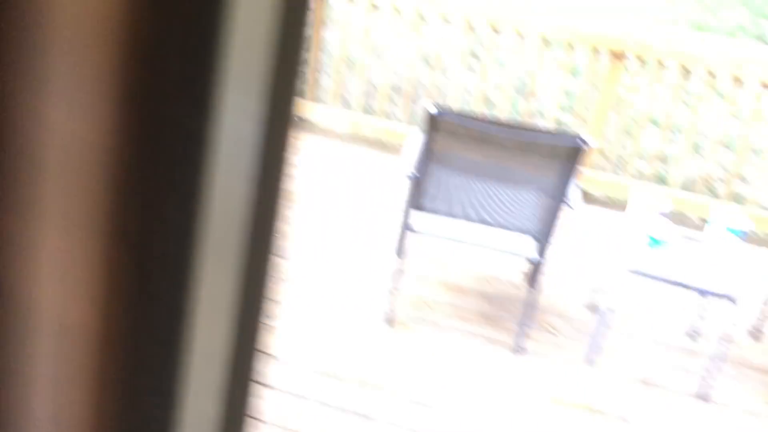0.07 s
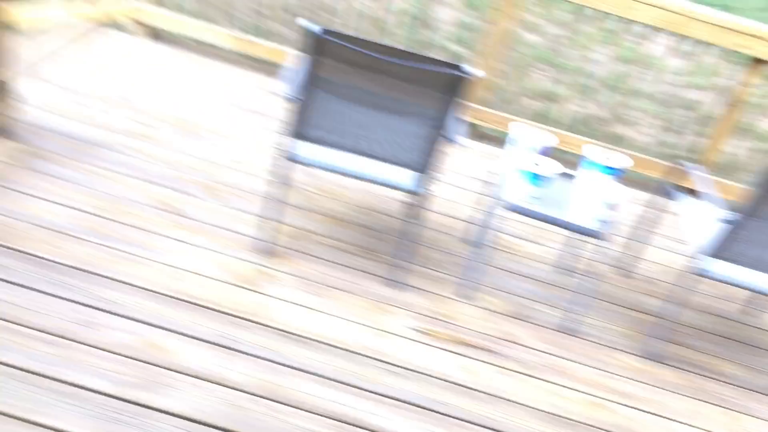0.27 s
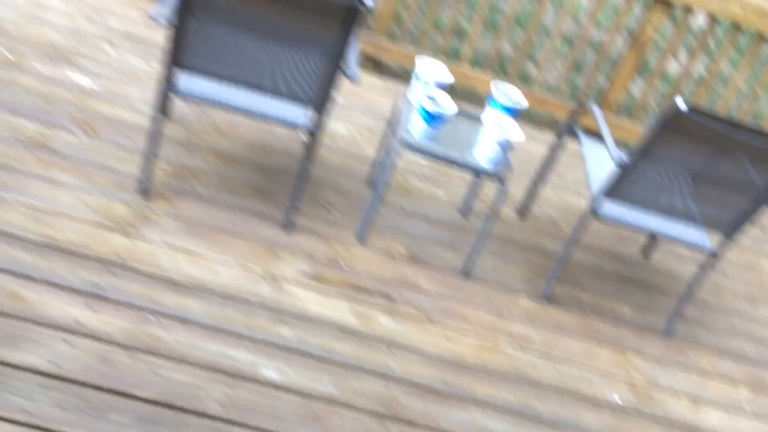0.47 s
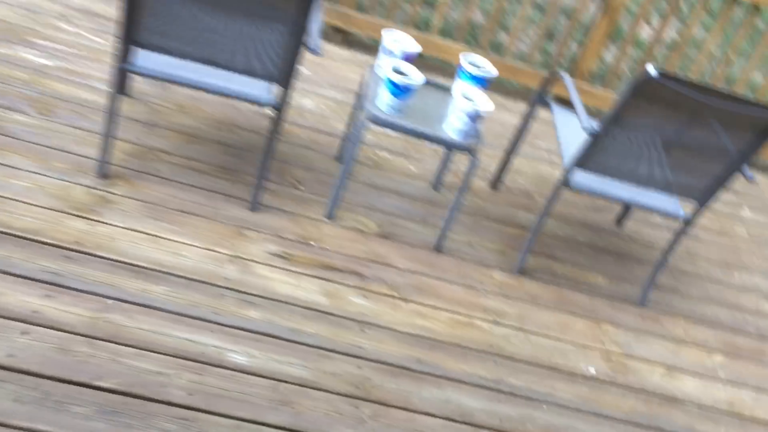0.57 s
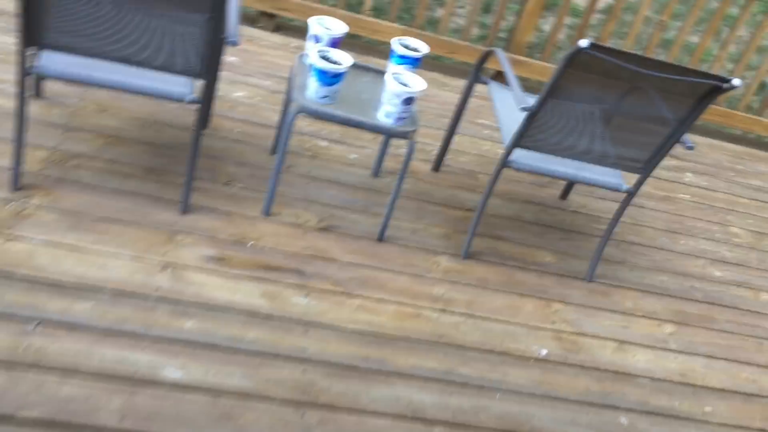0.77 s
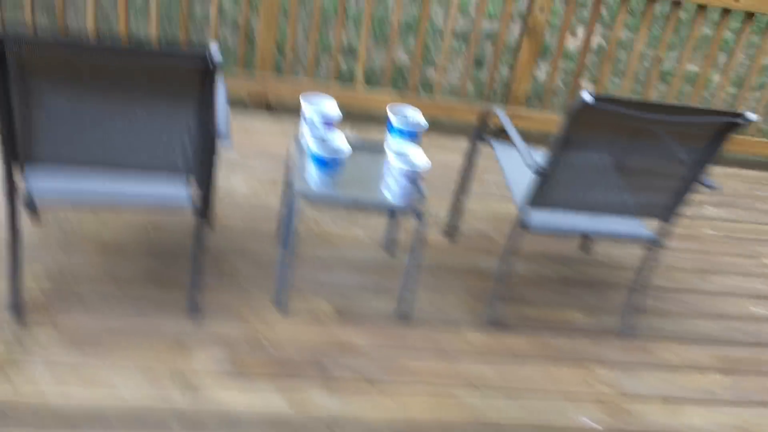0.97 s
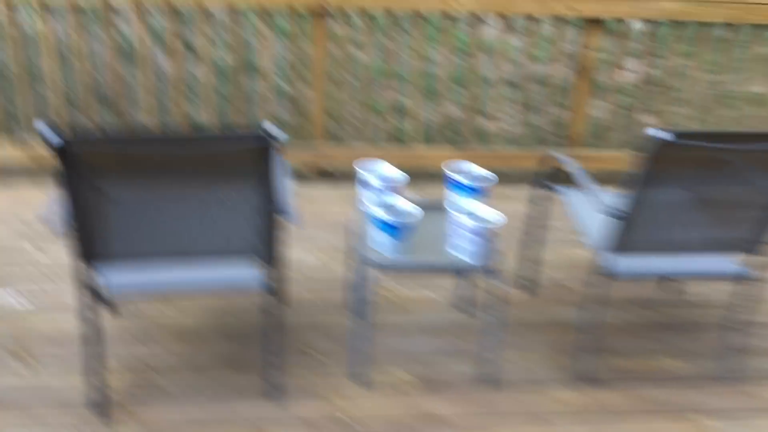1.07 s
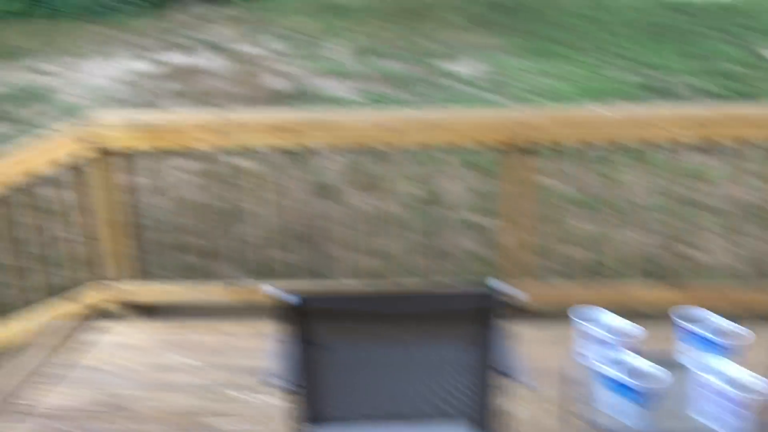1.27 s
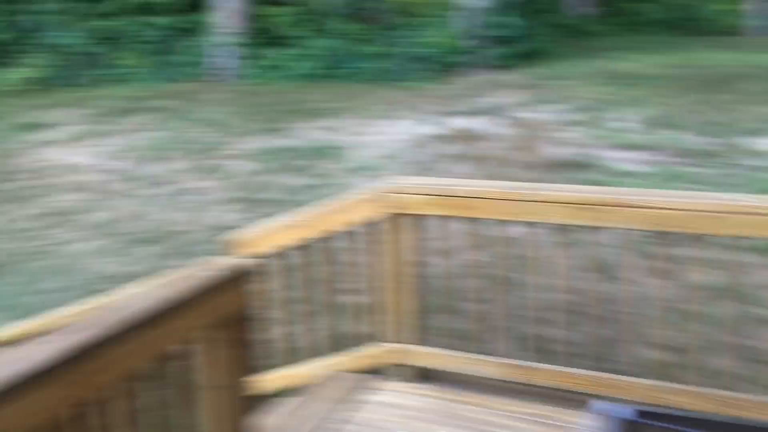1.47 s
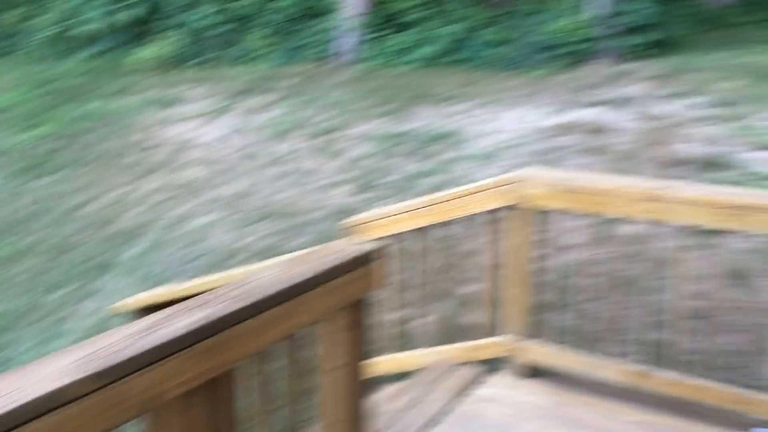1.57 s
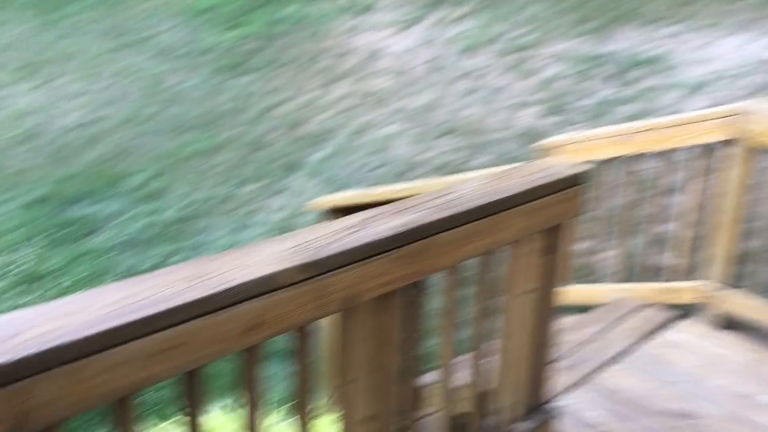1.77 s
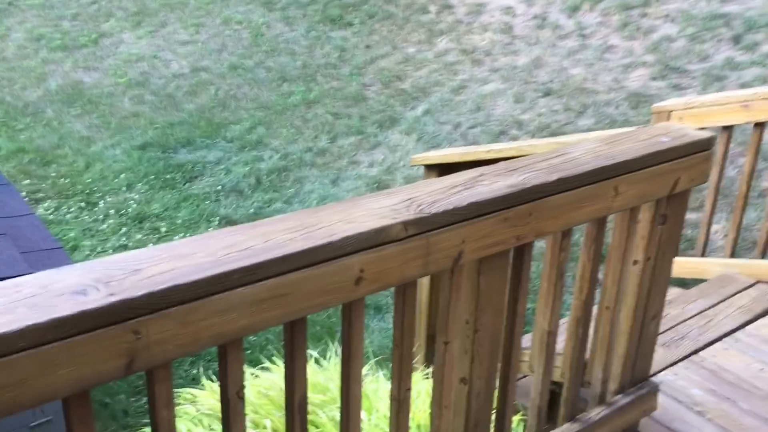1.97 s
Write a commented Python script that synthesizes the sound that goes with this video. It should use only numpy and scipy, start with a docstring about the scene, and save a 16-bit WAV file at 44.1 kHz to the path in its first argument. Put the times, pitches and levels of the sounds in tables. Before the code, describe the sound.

A heavy sliding glass door, already moving, rolls with loud rumble, knocks and brushy hiss, squeaks to a stop; then low footfalls on a hollow wooden deck and faint birds, heard through a handheld microphone.

```python
"""Sliding door, then steps on a deck

A glass door rolls to a stop: random grit rings pane and carriage, rollers knock, the brush seal hisses as
patchy noise, whistles and squeaks in gliding tones. Feet then land on a hollow wooden deck: decaying modes
boom, noise bursts knock and tick, a board creaks. Far birds call in gliding notes with fluttering echoes
over steady garden air.
"""
import sys
import numpy as np
from scipy import signal
from scipy.fft import rfft, irfft, next_fast_len
from scipy.io import wavfile
from scipy.ndimage import uniform_filter1d, map_coordinates

SR = 44100
rng = np.random.default_rng(int(sys.argv[2]) if len(sys.argv) > 2 else 0)


def put_to_file(sound):
    """Save the sound as 16-bit audio at rate SR, in the file named by the first command-line argument."""
    columns = np.atleast_2d(sound).T  # one column per channel
    safe = np.clip(columns, -1, 1)
    whole_steps = np.round(safe * 32767)
    wavfile.write(sys.argv[1], SR, whole_steps.astype(np.int16))


def convert_level_to_amplitude(level_db):
    """Map a level in decibels to its linear amplitude factor."""
    exponent = np.asarray(level_db, float) / 20
    return 10 ** exponent


N = 88861
T = np.arange(N) / SR

# Rolling door. Each row: time in seconds, rumble in dB, rattle in dB before a 1.5 dB lift,
# hiss in dB before a 2.5 dB lift.
ROLL = [(0, -27.5, -31, -39.5), (.13, -25, -30.5, -39), (.3, -27, -32.5, -34), (.39, -29, -34.5, -37.5),
        (.45, -33.5, -34.5, -36.5), (.49, -30, -37.5, -41.5), (.56, -39, -44.5, -40.5),
        (.67, -41.5, -54.5, -42.5), (.76, -48.5, -65.5, -45), (.812, -65, -58.5, -53.5),
        (.84, -60, -81, -67.5), (.95, -69, -92, -71)]
# Glass pane in its frame. Each row: resonance in Hz, width in Hz, relative level in dB.
PANE_MODES = [(95.6, 28, -2), (175.5, 20.5, 1.5), (224, 35, -1), (315.4, 14.8, 1.5), (361.4, 34, -3.5),
              (476, 74, -10.5)]
# Roller carriage and rail. Each row: resonance in Hz, width in Hz, relative level in dB.
CARRIAGE_MODES = [(597, 270, -0.5), (822, 59, 4), (980, 96, 0), (1200, 130, 2.5), (1400, 140, 1.5),
                  (1630, 204, 1), (2000, 450, -4)]
GRIT_PER_S, GRIT_SPREAD_DB, SMOOTH_POWER_SHARE = 700, 2.1, 0.45
# Brush seal. Each row: frequency in Hz, relative density in dB per Hz.
SEAL_SPECTRUM = [(1350, -10), (2300, -16.5), (3190, -5.5), (4690, -9), (6730, -5), (7590, -10.5),
                 (9050, -3.5), (10500, -4.5), (13800, -10.5), (15600, -1.5)]
# Bright whistle of the seal. Each row: time in seconds, level in dB, centre in Hz.
WHISTLE = [(0, -66, 13500), (.14, -54, 14200), (.176, -40, 14800), (.24, -40, 13300), (.31, -29, 15140),
           (.36, -32.5, 13800), (.397, -24.5, 14000), (.44, -30.5, 12930), (.49, -26.5, 13030),
           (.53, -40, 12600), (.65, -40, 13250), (.76, -50, 13200), (.85, -64, 12900)]
WHISTLE_HALF_WIDTH_HZ, WHISTLE_PATCHY_DB = 1300, 5
# Lowest shudder of frame and deck. Each row: time in seconds, level in dB.
SHUDDER = [(0, -28), (.3, -41), (.42, -33), (.5, -28.5), (.62, -39), (.8, -47.5), (1.1, -50), (1.4, -60),
           (1.46, -39), (1.51, -52), (1.56, -38.5), (1.75, -39.5), (1.9, -42.5), (1.97, -33.5), (2.02, -37)]
# Noise of the shudder. Each row: frequency in Hz, relative density in dB per Hz.
SHUDDER_SPECTRUM = [(25, -2), (45, -5.5), (58, -3), (70, -10.5), (110, -13.5), (150, -41)]
SHUDDER_HZ, SHUDDER_NOISE_DB = 58.16, -5.5
# Garden air. Each row: frequency in Hz, relative density in dB per Hz.
AIR_SPECTRUM = [(53, -20), (90, 2.5), (238, 0.5), (260, -7.5), (427, -12.5), (519, -16.5), (817, -14),
                (3190, -17), (4320, -23.5), (5130, -23), (8080, -25.5), (15800, -23)]
AIR_DB = -54
# Faint wavering far tones. Each row: frequency in Hz, level in dB before a 3 dB lift.
WHINES = [(1518, -73), (1750, -71)]
# Rollers over lumps. Each row: start in seconds, nominal level in dB, centre in Hz, width in Hz, t60 in seconds.
KNOCKS = [(.075, -12, 1416, 500, 0.028), (.082, -22, 1640, 900, 0.039), (.170, -7.5, 1430, 350, 0.026),
          (.238, -19.5, 1974, 1800, 0.028), (.289, -19.5, 1200, 600, 0.028), (.303, -12, 880, 900, 0.013),
          (.336, -22, 2000, 600, 0.03), (.420, -12.5, 1830, 2500, 0.023), (.448, -33, 5000, 5000, 0.0069),
          (.537, -20, 1550, 200, 0.028), (.542, -30, 786, 150, 0.05), (.570, -23, 1490, 1200, 0.016),
          (.708, -36, 1620, 250, 0.053), (.325, -23, 6370, 3500, 0.062)]
CRACK_T60_S = 0.01
# Hum of the pane. The row: end in seconds, minus the length in seconds, pitch in Hz, level in dB.
PANE_HUM = (0.44, -0.36, 175, -43.5)
# Squeaks of the seal. Each row: start in seconds, length in seconds, first pitch in Hz, last pitch in Hz,
# level in dB, roughness 0-1, bend (over 1 the pitch moves early, under 1 late).
SQUEAKS = [(0.527, 0.006, 4740, 4670, -49, 0.2, 1), (.537, .025, 4800, 3480, -32, .25, 2.8),
           (.558, .036, 4100, 3200, -33, .35, 1), (0.677, 0.0089, 3400, 3330, -41.5, 0.48, 0.91),
           (0.694, 0.031, 2250, 2000, -43.5, 0.34, 2.26), (0.716, 0.043, 2260, 2210, -45, 0.076, 1),
           (0.734, 0.033, 3377, 3080, -40, 0.54, 2.1)]
# Last drag of the seal. The row: start in seconds, length in seconds, level in dB.
SCRAPE = (0.661, 0.17, -44.5)
# Colour of the drag. Each row: frequency in Hz, relative density in dB per Hz.
SCRAPE_SPECTRUM = [(1500, -22), (2100, 2), (2500, -1.5), (3100, 5), (3700, -4), (4300, -29)]
# Small ticks of shoe and boards. Each row: start in seconds, nominal level in dB, centre in Hz, width in Hz,
# t60 in seconds.
TICKS = [(1.102, -36.5, 1193, 400, 0.035), (1.102, -40.5, 1906, 1780, 0.066),
         (1.138, -36, 872, 2500, 0.063), (1.233, -32.5, 1285, 1800, 0.022), (1.32, -42, 2430, 1500, 0.031),
         (1.580, -41, 2460, 590, 0.027), (1.295, -38.5, 8360, 9000, 0.025)]
# Heel, sole and toe landings. Each row: time in seconds, boom in dB, knock in dB.
STEPS = [(1.109, -15, -42), (1.138, -24, -41), (1.231, -27, -57), (1.798, -25.5, -35.5)]
# Low modes of the deck. Each row: frequency in Hz, level in dB added to the boom, t60 in seconds.
DECK_MODES = [(57.54, -8.5, 0.56), (69.5, 2.5, 0.4), (77.3, -1, 0.22), (94.8, -4, 0.17), (157.6, -18, 0.23),
              (253, -24, 0.075)]
# Knock of the boards. Each row: frequency in Hz, relative density in dB per Hz.
KNOCK_SPECTRUM = [(130, -10), (330, 3.5), (480, -8.5), (650, -8.5), (850, -21), (2500, -33)]
BOOM_ATTACK_S, KNOCK_T60_S = 0.007, 0.15
# Far bird notes. Each row: start in seconds, length in seconds, first pitch in Hz, last pitch in Hz,
# level in dB before the garden echo, octave overtone in dB relative to the note, buzz (0 is pure).
NOTES = [(1.201, 0.049, 6780, 6500, -60, -26, 0.5), (1.236, 0.041, 3270, 2930, -64, 13.5, 0.12),
         (1.36, 0.047, 3850, 4800, -59.5, -10, 0.3), (1.398, 0.036, 4590, 4160, -56.5, -30, 0.3),
         (1.396, 0.03, 8330, 7630, -57.5, -30, 0.4), (1.535, 0.035, 4810, 4705, -54, -19, .5),
         (1.57, 0.035, 4410, 3940, -57.5, -6, 0.45), (1.668, .02, 3500, 3520, -65, -30, 0.1),
         (1.687, 0.03, 3504, 2400, -48.5, -35, 0.25), (1.713, 0.167, 2496, 2020, -48, -42, 0.07),
         (1.98, 0.082, 4220, 4170, -59, -28, 1.5)]
# Near pips. Each row: start in seconds, length in seconds, pitch in Hz, level in dB.
PIPS = [(1.634, 0.021, 2256, -44.5), (1.674, 0.02, 2250, -52), (1.713, 0.017, 2340, -39.5)]
LEVEL_OFF_S = 0.06  # the longer a note against this, the earlier its pitch levels off
GARDEN_T60_S, NOTE_ECHO_DB, PIP_ECHO_DB, LEAF_FLUTTER_HZ = 0.5, -1, -12, 900
# Board groaning under weight. The row: start in seconds, length in seconds, first pitch in Hz,
# last pitch in Hz, level in dB.
CREAK = (1.83, .095, 170, 230, -50)
# Notch of the microphone port. The row: centre in Hz, half width in Hz at 1/e, depth 0-1.
MIC_DIP = (10270, 340, 0.39)
MIC_LOW_HZ, TOP_HZ = 33.4, 15750


def unit(x):
    """Scaled to rms 1."""
    return x / np.sqrt(np.mean(x ** 2) + 1e-20)


def curves(rows):
    """One value per sample for each column after the time."""
    time_s, *columns = np.transpose(rows)
    return [np.interp(T, time_s, column) for column in columns]


def wobble(knots_per_s):
    """A smooth random curve through normally distributed knots."""
    knots = rng.standard_normal(int(N * knots_per_s / SR) + 4)
    return map_coordinates(knots, [T * knots_per_s])


def filtered(x, response):
    """x with its spectrum times a response of frequency, real or complex."""
    m = next_fast_len(N + SR // 2)
    return irfft(rfft(x, m) * response(np.fft.rfftfreq(m, 1 / SR)), m)[:N]


def body(modes):
    """Causal response of a set of resonances with alternating sign."""
    def response(f):
        total = 0
        for k, (hz, width_hz, db) in enumerate(modes):
            damping = 1j * f * width_hz
            total = total + (-1) ** k * convert_level_to_amplitude(db) * damping / (hz * hz - f * f + damping)
        return total
    return response


def patchy(x, patchy_db, size):
    """x with patches of random gain in time and frequency."""
    bins = signal.stft(x, nperseg=256)[2]
    field = uniform_filter1d(rng.standard_normal(bins.shape), size=size, axis=0)
    field = uniform_filter1d(field, size=2 * size, axis=1)
    return signal.istft(bins * convert_level_to_amplitude(patchy_db * unit(field)), nperseg=256)[1][:N]


def rush(spectrum, patchy_db):
    """Coloured, patchy noise of rms 1."""
    f, db = np.transpose(spectrum)
    noise = patchy(rng.standard_normal(N), patchy_db, size=5)
    return unit(filtered(noise, lambda hz: convert_level_to_amplitude(np.interp(np.log(hz + 1), np.log(f), db, -120, -120))))


def grit():
    """Random bumps of uneven size on a smooth noise."""
    hits = rng.random(N) < GRIT_PER_S / SR
    sizes = convert_level_to_amplitude(GRIT_SPREAD_DB * rng.exponential(size=N))
    bumps = unit(hits * sizes * rng.choice([-1, 1], N))
    smooth = rng.standard_normal(N)
    return np.sqrt(1 - SMOOTH_POWER_SHARE) * bumps + np.sqrt(SMOOTH_POWER_SHARE) * smooth


def glide(start_s, length_s, from_hz, to_hz, bend):
    """Swelling envelope and running phase of a gliding note; a bend over 1 moves the pitch early."""
    u = np.clip((T - start_s) / length_s, 0, 1)
    hz = to_hz + (from_hz - to_hz) * (1 - u) ** bend
    envelope = np.sqrt(np.abs(np.sin(np.pi * u))) * (u < 1)
    return envelope, 2 * np.pi * np.cumsum(hz) / SR


def taps(rows, crack):
    """Contacts as dying noise bands, the narrow ones ringing, led by a short dull crack."""
    out, t = np.zeros(N + SR), T[:SR // 8]
    for start_s, db, hz, width_hz, t60_s in rows:
        window = np.hanning(int(SR / width_hz) + 3)
        band = np.convolve(rng.standard_normal(len(t) + SR // 20), window, "valid")[:len(t)]
        band = band / np.sqrt(np.mean(band[:SR // 150] ** 2))
        ring = min(1, 0.3 * hz / width_hz)
        tone = (ring + 0.75 * band) * np.sin(2 * np.pi * hz * t)
        dull = uniform_filter1d(rng.standard_normal(len(t)), size=6)
        snap = crack * convert_level_to_amplitude(-60 * t / CRACK_T60_S) * dull
        envelope = convert_level_to_amplitude(db - 60 * t / t60_s) * (1 - np.exp(-t / 0.0013))
        out[round(start_s * SR):][:len(t)] += envelope * (tone + snap)
    return out[:N]


def rollers():
    """Grit under the rollers shakes the pane into rumble and the carriage into rattle."""
    rumble_db, rattle_db, _ = curves(ROLL)
    pane, carriage = body(PANE_MODES), body(CARRIAGE_MODES)
    low = lambda f: pane(f) / (1 + (f / 600) ** 4)
    mid = lambda f: carriage(f) / (1 + (f / 2300) ** 4) / (1 + (500 / (f + 1)) ** 4)
    rumble = convert_level_to_amplitude(rumble_db) * unit(filtered(grit(), low))
    rattle = convert_level_to_amplitude(rattle_db + 1.5 + 1.72 * wobble(46.1)) * unit(filtered(grit(), mid))
    return (T < ROLL[-1][0]) * (rumble + rattle)


def seal_hiss():
    """Bristles brush the frame: coloured noise with fast and slow level wobble."""
    hiss_db = curves(ROLL)[2]
    bristles = convert_level_to_amplitude(1.8 * wobble(350)) * rush(SEAL_SPECTRUM, patchy_db=2.4)
    return (T < ROLL[-1][0]) * convert_level_to_amplitude(hiss_db + 2.5 + 0.78 * wobble(34.75)) * bristles


def seal_whistle():
    """Low noise multiplied by a gliding sine: a patchy band around a moving centre."""
    level_db, hz = curves(WHISTLE)
    low_noise = filtered(rng.standard_normal(N), lambda f: np.exp(-(f / WHISTLE_HALF_WIDTH_HZ) ** 2))
    band = low_noise * np.sin(2 * np.pi * np.cumsum(hz) / SR)
    whistle = unit(patchy(band, WHISTLE_PATCHY_DB, size=3))
    return (T < WHISTLE[-1][0]) * convert_level_to_amplitude(level_db + 0.63 * wobble(200)) * whistle


def shudder():
    """Frame and deck sway at one low pitch of wandering phase, with low noise."""
    sway = np.sin(2 * np.pi * SHUDDER_HZ * T + 2.16 * wobble(9.9))
    noise = convert_level_to_amplitude(SHUDDER_NOISE_DB) * rush(SHUDDER_SPECTRUM, patchy_db=-0.5)
    return convert_level_to_amplitude(curves(SHUDDER)[0]) * unit(sway + noise)


def garden():
    """Steady outdoor air as coloured noise, with two thin far tones wavering in level and phase."""
    out = convert_level_to_amplitude(AIR_DB) * rush(AIR_SPECTRUM, patchy_db=0.7)
    for hz, db in WHINES:
        out += convert_level_to_amplitude(db + 3 + 2.5 * wobble(8)) * np.sin(2 * np.pi * hz * T + 2.2 * wobble(30))
    return out


def roller_knocks():
    """Rollers knock over lumps: short cracks and ringing noise bands."""
    return taps(KNOCKS, crack=1.0)


def pane_hum():
    """The pane hums at one pitch, unsteady in level and phase."""
    end_s, minus_length_s, hz, db = PANE_HUM
    envelope, phase = glide(end_s, minus_length_s, hz, hz, bend=1)
    return convert_level_to_amplitude(db + 3.3 * wobble(17.8)) * envelope * np.sin(phase + wobble(12.5))


def squeaks():
    """Stick-slip tones of the seal, the rough ones smeared by random phase."""
    out = np.zeros(N)
    for start_s, length_s, from_hz, to_hz, db, rough, bend in SQUEAKS:
        envelope, phase = glide(start_s, length_s, from_hz, to_hz, bend)
        level = convert_level_to_amplitude(db + 1.5 * rough * wobble(134.5))
        out += level * envelope * np.sin(phase + 3 * rough * wobble(500))
    return out


def scrape():
    """Final drag of the seal: a swell of coloured noise."""
    start_s, length_s, db = SCRAPE
    envelope, _ = glide(start_s, length_s, 0, 0, bend=1)
    return convert_level_to_amplitude(db) * envelope * rush(SCRAPE_SPECTRUM, patchy_db=1.5)


def ticks():
    """Shoe and boards tick: small noise bands without a crack."""
    return taps(TICKS, crack=0)


def footsteps():
    """Landing feet ring the low modes of the deck and knock its boards."""
    out = np.zeros(N)
    noise = rush(KNOCK_SPECTRUM, patchy_db=-3.5)
    for start_s, boom_db, knock_db in STEPS:
        t = np.maximum(T - start_s, 0)
        attack = (1 - np.exp(-t / BOOM_ATTACK_S)) ** 2
        for hz, mode_db, t60_s in DECK_MODES:
            decay = convert_level_to_amplitude(boom_db + mode_db - 60 * t / t60_s)
            out -= attack * decay * np.sin(2 * np.pi * hz * t + np.pi * 0.6)
        t = np.maximum(T - start_s + 0.0034, 0)  # the knock leads the boom
        out += (1 - np.exp(-t / 0.0068)) * convert_level_to_amplitude(knock_db - 60 * t / KNOCK_T60_S) * noise
    return out


def bird_notes():
    """Far whistles with an octave overtone, buzzing where noise shakes their phase."""
    out = np.zeros(N)
    for start_s, length_s, from_hz, to_hz, db, over_db, buzz in NOTES:
        envelope, phase = glide(start_s, length_s, from_hz, to_hz, bend=1 + length_s / LEVEL_OFF_S)
        phase = phase + 2.5 * buzz * wobble(600)
        tone = np.sin(phase) + convert_level_to_amplitude(over_db) * np.sin(2 * phase)
        out += convert_level_to_amplitude(db + 1.2 * wobble(120)) * envelope * tone
    return out


def bird_pips():
    """Short pure tones of steady pitch, close by."""
    out = np.zeros(N)
    for start_s, length_s, hz, db in PIPS:
        envelope, phase = glide(start_s, length_s, hz, hz, bend=1)
        out += convert_level_to_amplitude(db) * envelope ** 2 * np.sin(phase)
    return out


def birds():
    """Notes and pips, blurred by a decaying noise echo from the trees that flutters in level."""
    far, near = bird_notes(), bird_pips()
    t = T[:SR // 2]
    tail = rng.standard_normal(len(t)) * convert_level_to_amplitude(-60 * t / GARDEN_T60_S) * (t > 0.006)
    sent = convert_level_to_amplitude(NOTE_ECHO_DB) * far + convert_level_to_amplitude(PIP_ECHO_DB) * near
    echo = signal.fftconvolve(sent, tail / np.linalg.norm(tail))[:N]
    return far + near + echo * unit(2 + wobble(LEAF_FLUTTER_HZ))


def creak():
    """A loaded board groans: one gliding low tone."""
    *note, db = CREAK
    envelope, phase = glide(*note, bend=0.98)
    return convert_level_to_amplitude(db) * envelope * np.sin(phase)


def scene():
    """All sources, one channel."""
    door = rollers() + seal_hiss() + seal_whistle() + roller_knocks() + pane_hum() + squeaks() + scrape()
    deck = shudder() + ticks() + footsteps() + creak()
    return (door + deck + birds() + garden())[None]


def band_limit(x):
    """A steep low-pass at the top of the band."""
    return signal.sosfilt(signal.butter(12, 16440, fs=SR, output="sos"), x)


def record(dry):
    """Microphone response: bass roll-off, port notch and top band limit."""
    dip_hz, half_width_hz, depth = MIC_DIP

    def microphone(hz):
        bass = hz ** 2 / (hz ** 2 + MIC_LOW_HZ ** 2)
        notch = 1 - depth * np.exp(-((hz - dip_hz) / half_width_hz) ** 2)
        return (hz < TOP_HZ) * bass * notch

    mix = filtered(dry[0], microphone)[None]
    return band_limit(mix)


dry = scene()
out = record(dry)
put_to_file(out)
```